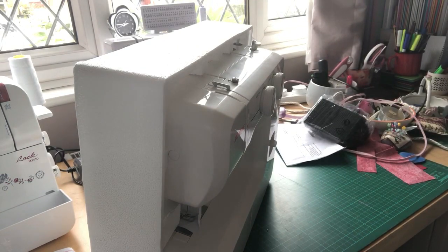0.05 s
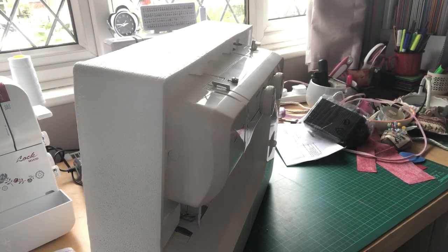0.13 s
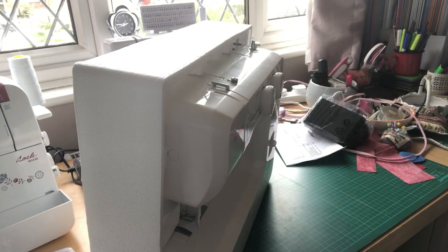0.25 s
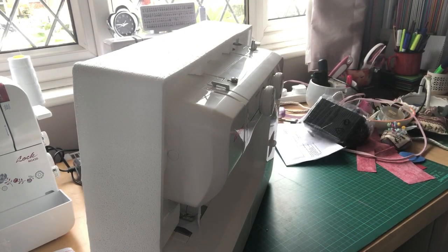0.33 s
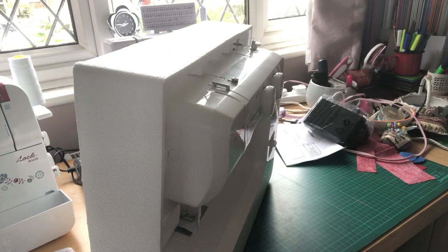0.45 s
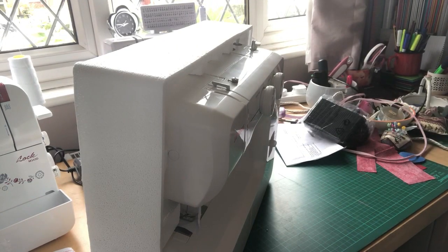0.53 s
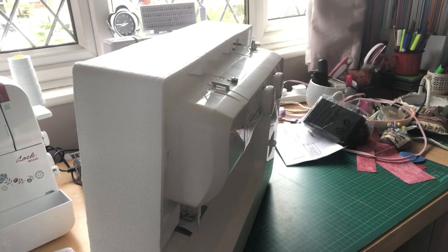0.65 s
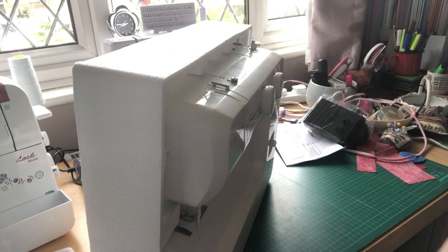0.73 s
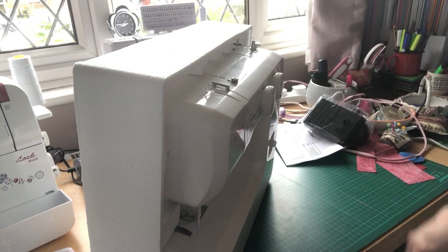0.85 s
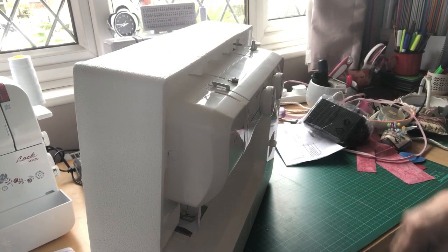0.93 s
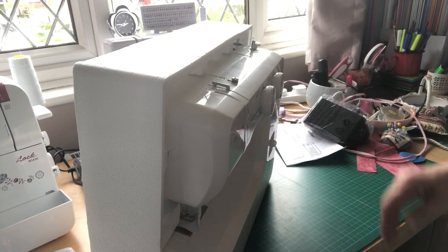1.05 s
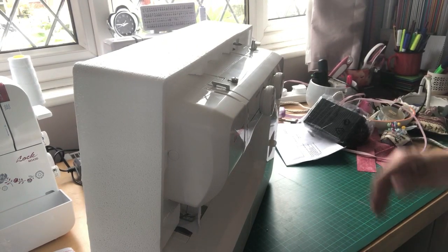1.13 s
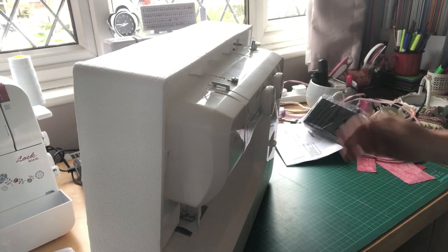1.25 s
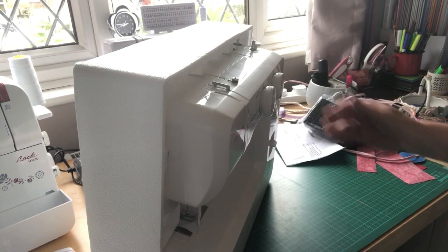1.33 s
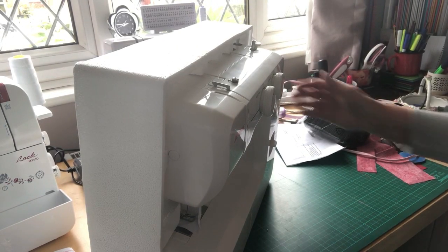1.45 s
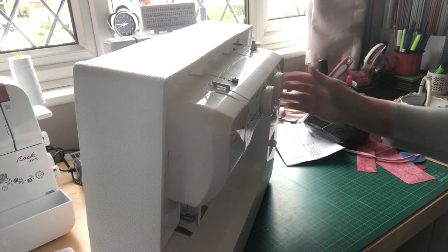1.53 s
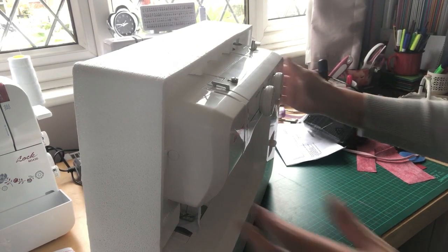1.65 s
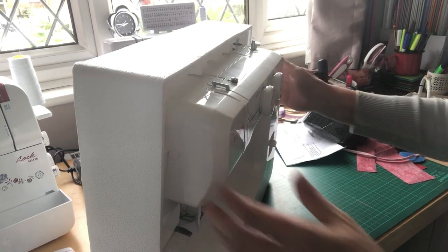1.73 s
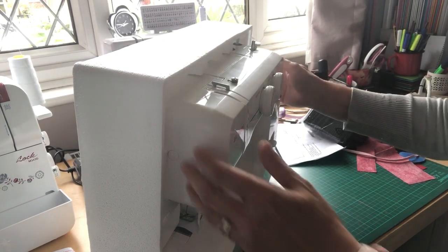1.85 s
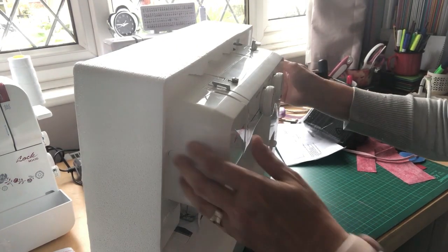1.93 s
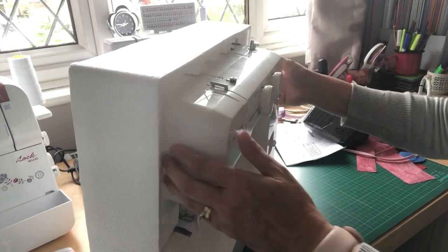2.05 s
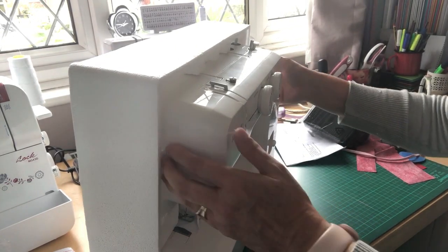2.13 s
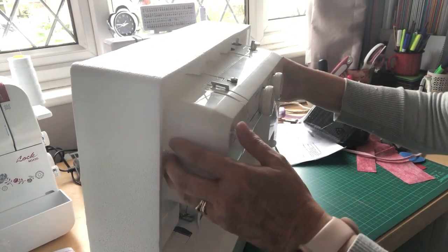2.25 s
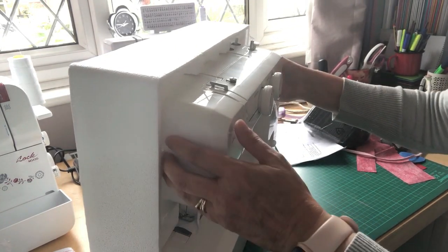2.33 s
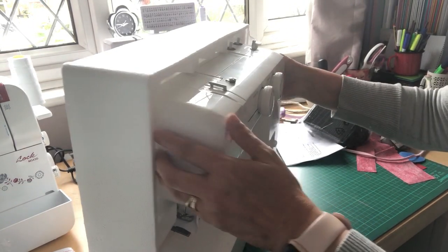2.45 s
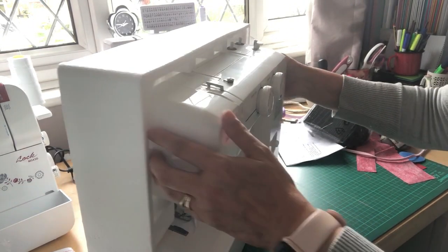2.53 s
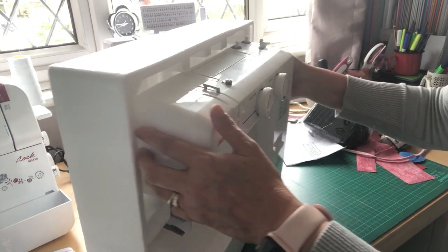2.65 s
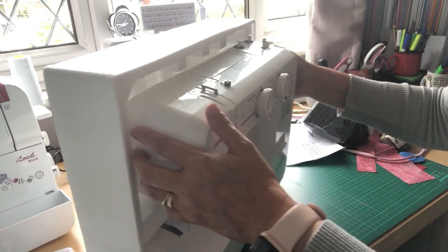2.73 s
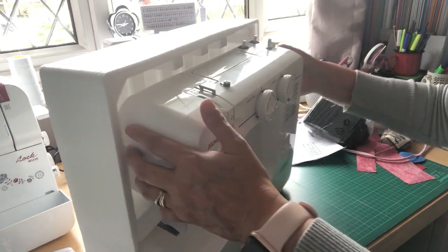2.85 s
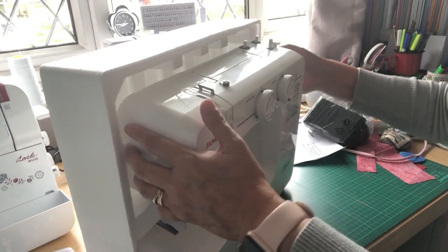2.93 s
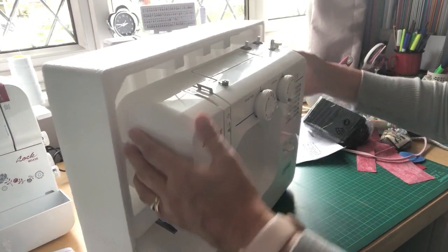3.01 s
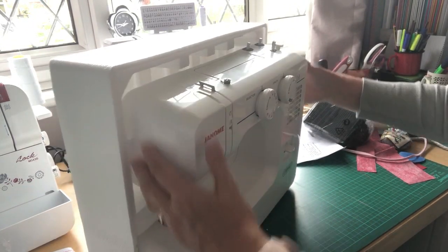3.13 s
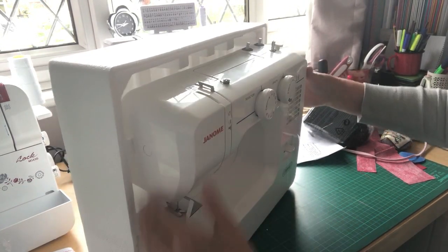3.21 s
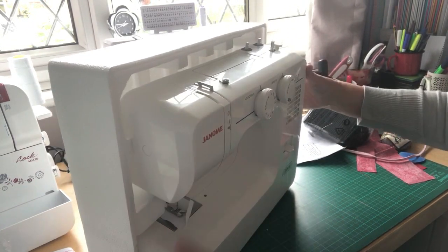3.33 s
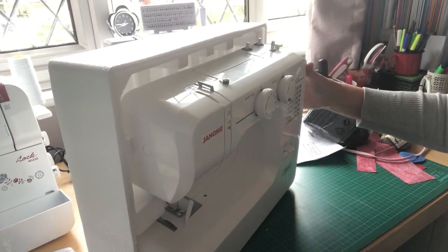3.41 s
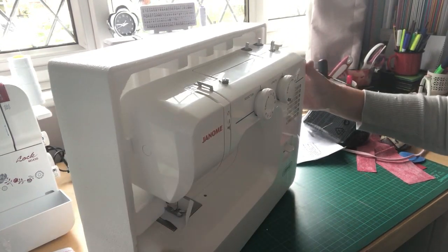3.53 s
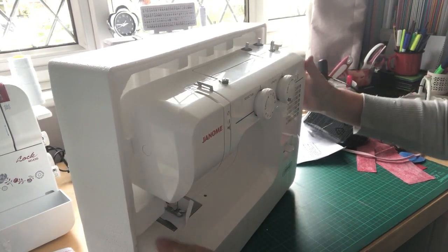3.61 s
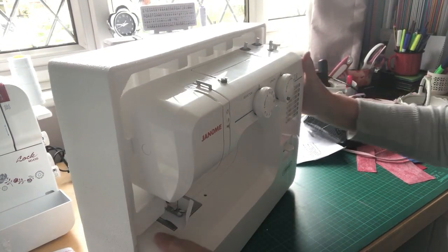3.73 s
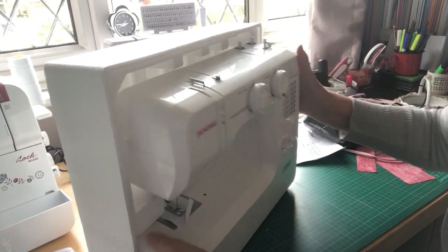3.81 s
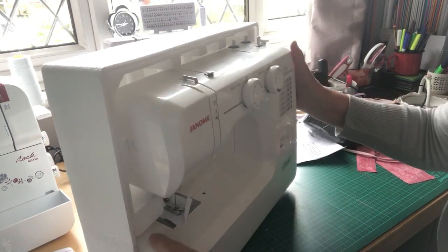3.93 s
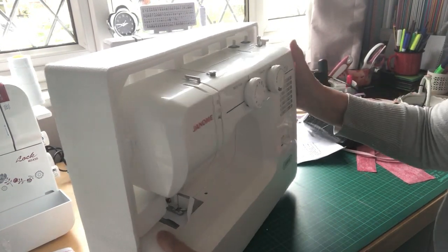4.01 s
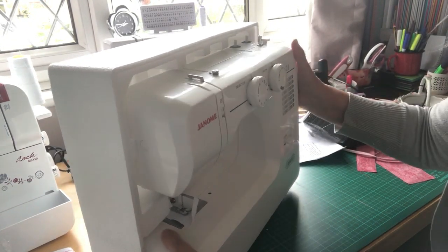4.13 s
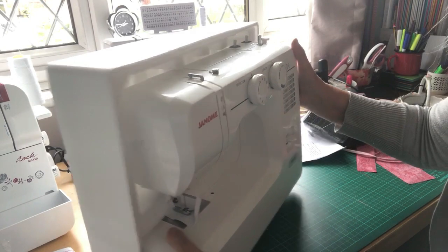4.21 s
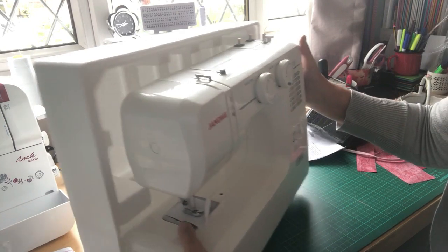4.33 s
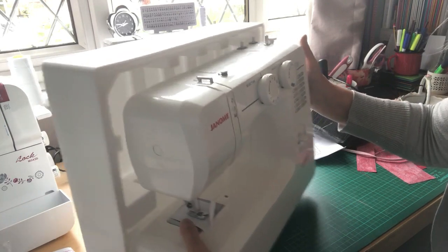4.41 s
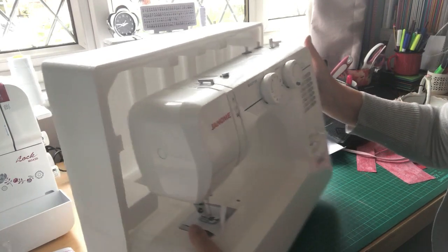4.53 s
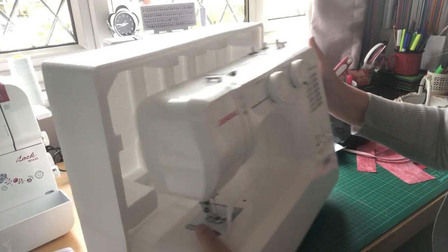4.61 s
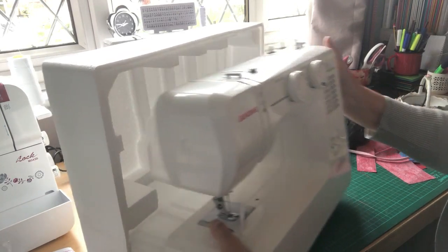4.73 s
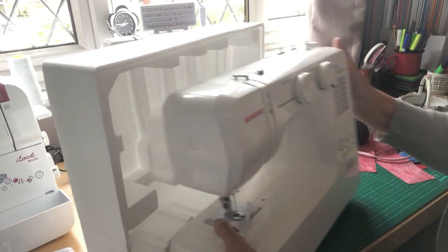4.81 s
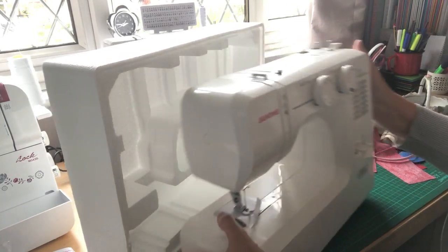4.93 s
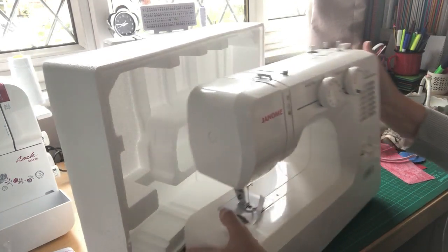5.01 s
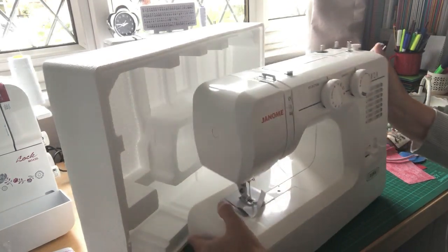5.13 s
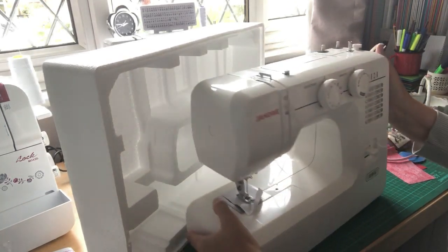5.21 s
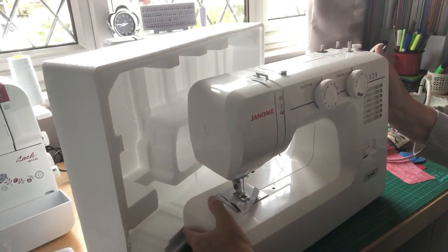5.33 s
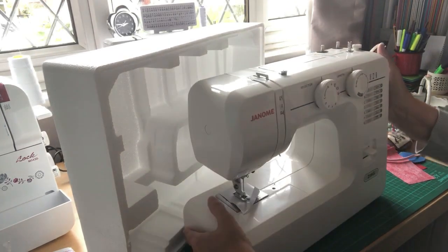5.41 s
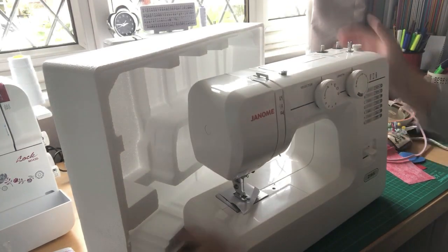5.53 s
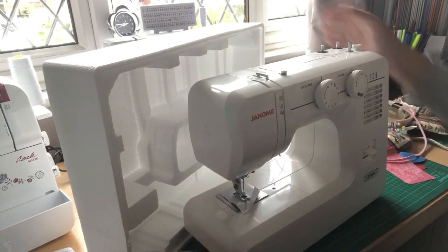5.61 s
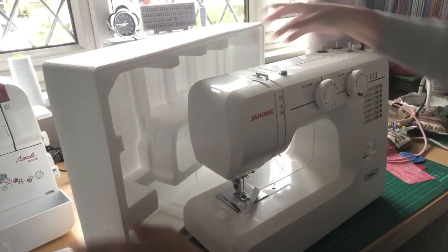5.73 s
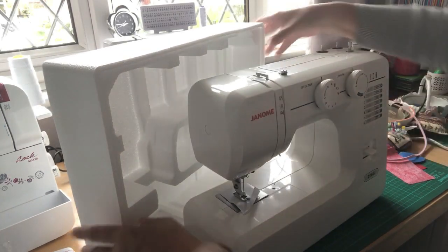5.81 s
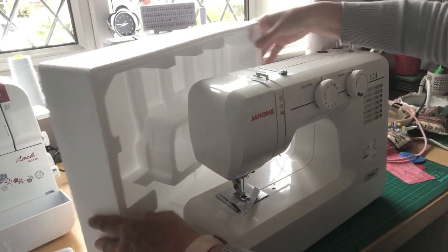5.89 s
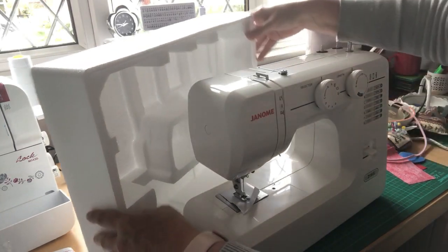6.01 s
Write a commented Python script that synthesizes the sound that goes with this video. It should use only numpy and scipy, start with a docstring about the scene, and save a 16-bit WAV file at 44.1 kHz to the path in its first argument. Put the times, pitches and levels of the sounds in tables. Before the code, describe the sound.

A quiet small furnished room with faint, low air, heard close. From 0 to 1.7 s there are only weak dry foam rustles, a small click at 0.4, soft ticks and a barely audible sinking low tone near 1.2. At 1.77 a fingertip tap and light bump on plastic. From 2.05 foam is gripped and rubbed: a sharp snap, hollow boxy bumps, a strong scrape at 2.2, another at 2.45. A knock at 2.7 leads into a cluster of snaps and a rough creak from 2.8 to 3.1. A short lull, then scraping resumes from 3.4, with a creak at 3.7 and a crisp crack and squeak at 3.79. The loudest moment is 4.1 to 4.4: hard bright cracks, a harsh rub, rising creak and tiny squeaks. Bumps and dull desk thuds follow at 4.45, 4.87 and 5.19, with faint contact at 5.43. Near silence, then a crisp foam scrape from 5.9 to the end.

```python
"""Stiff foam rubs, creaks and snaps free in jerks as a sewing machine is worked out of its moulded block.
Rubbing is many random bead clicks, shaped by each stroke; creaks pulse it, and snaps are short bursts.
The hollow block booms when bumped and the desk thuds under the machine, both as sets of fading tones.
Later the hands take hold of the block again. There are also short squeaks, taps on the plastic housing
and a faint sinking tone, over the quiet air of a small furnished room."""
import sys
import numpy as np
from scipy import signal
from scipy.io import wavfile
from scipy.ndimage import uniform_filter1d

SR = 44100
rng = np.random.default_rng(int(sys.argv[2]) if len(sys.argv) > 2 else 0)


def unload_audio(sound):
    """Save the sound as a 16-bit wav file, at the path given as the first command line argument."""
    columns = np.transpose(np.atleast_2d(sound))
    # keep every value between -1 and 1, then stretch to whole-number steps
    steps = np.round(np.clip(columns, -1, 1) * 32767)
    wavfile.write(sys.argv[1], SR, steps.astype(np.int16))


N = 267246  # length of the scene in samples, about 6 s
REST_DB = -75  # steady faint hiss under all strokes, before mixing

# Strokes of foam over plastic; levels are before mixing. Columns:
# (start [s], attack [s], hold [s], release [s per 20 dB], hiss level [dB],
#  rasp of the pressed edges [dB against hiss], fizz of the sharpest beads [dB against hiss])
STROKES = [(0.106, 0.012, 0.31, 0.654, -67.0, 7.0, -17.0), (0.223, 0.011, 0.009, 0.083, -65.0, 12.5, -17.5),
           (0.403, 0.069, 0.034, 0.19, -55.5, 3.5, -10.5), (0.594, 0.032, 0.032, 0.053, -53.0, -1.5, -12.0),
           (0.719, 0.042, 0.017, 0.144, -59.0, -5.5, -7.0), (0.885, 0.041, 0.006, 0.07, -58.0, -20.5, -4.5),
           (1.047, 0.064, 0.009, 0.051, -61.0, 3.5, -22.5), (1.163, 0.149, 0.015, 0.331, -59.5, 3.5, -16.5),
           (1.766, 0.054, 0.014, 0.03, -66.5, 16.0, -20.0),
           (2.017, 0.005, 0.059, 0.153, -57.0, 10.0, -11.0), (2.089, 0.009, 0.034, 0.04, -46.5, 4.5, -4.5),
           (2.17, 0.047, 0.007, 0.121, -36.0, 2.0, -11.0), (2.326, 0.022, 0.086, 0.092, -52.5, 11.5, -6.5),
           (2.413, 0.082, 0.088, 0.155, -40.5, -1.5, -10.0),
           (2.571, 0.083, 0.062, 0.044, -44.5, 5.0, -15.5), (2.739, 0.035, 0.022, 0.03, -51.0, 9.0, -12.5),
           (2.786, 0.016, 0.037, 0.092, -41.5, 12.0, -6.0), (2.891, 0.012, 0.035, 0.042, -48.5, 7.0, -22.5),
           (2.94, 0.017, 0.056, 0.178, -46.5, 13.0, -12.0), (3.039, 0.07, 0.051, 0.04, -46.5, -3.5, -5.0),
           (3.288, 0.005, 0.012, 0.15, -55.0, 6.5, -11.0), (3.407, 0.113, 0.024, 0.05, -45.5, -3.5, -7.5),
           (3.586, 0.018, 0.031, 0.033, -38.0, -9.0, -5.5), (3.6, 0.041, 0.085, 0.108, -44.0, 8.5, -21.0),
           (3.789, 0.005, 0.019, 0.138, -47.5, 1.0, -12.5), (3.838, 0.12, 0.022, 0.073, -44.5, 1.0, -18.0),
           (4.012, 0.023, 0.085, 0.096, -44.0, -2.0, -19.0), (4.116, 0.03, 0.072, 0.1, -38.0, -3.5, -9.0),
           (4.2, 0.066, 0.014, 0.081, -28.0, -9.5, -4.0), (4.324, 0.01, 0.033, 0.135, -38.5, -1.5, -22.5),
           (4.418, 0.022, 0.015, 0.077, -45.0, 5.5, -5.5), (4.548, 0.02, 0.011, 0.124, -63.5, 10.0, -18.5),
           (4.667, 0.032, 0.01, 0.056, -72.0, 13.5, -20.0), (5.073, 0.011, 0.041, 0.1, -64.5, 5.0, -18.5),
           (5.168, 0.021, 0.084, 0.091, -70.0, 17.0, -20.5),
           (5.452, 0.016, 0.019, 0.023, -59.0, 0.5, -10.0), (5.898, 0.006, 0.043, 0.214, -39.0, -5.5, -4.5),
           (5.959, 0.089, 0.025, 0.1, -35.5, -7.0, -2.5)]


def stroke_strengths():
    """Each stroke builds, holds and lets go; returns the strength of hiss, rasp and fizz over time."""
    sag_db_per_s = 10  # a stroke loses force from its start onward
    rasp_power, fizz_power = .88, 1.25  # as the force fades, the rasp lingers and the fizz goes first
    t = np.arange(SR) / SR
    power = np.zeros((3, N))
    for start, attack_s, hold_s, release_s, hiss_db, rasp_db, fizz_db in STROKES:
        build = np.sin(np.pi / 2 * np.minimum(t / attack_s, 1)) ** 2
        release_db = 20 * np.maximum(t - attack_s - hold_s, 0) / release_s
        force = build * gain_of(-sag_db_per_s * t - release_db)
        add(power[0], start, (gain_of(hiss_db) * force) ** 2)
        add(power[1], start, (gain_of(hiss_db + rasp_db) * force ** rasp_power) ** 2)
        add(power[2], start, (gain_of(hiss_db + fizz_db) * force ** fizz_power) ** 2)
    power[0] += gain_of(REST_DB) ** 2
    return np.sqrt(power)


# Stick-slip creaks. Columns: (start [s], end [s], first rate [slips per s], last rate [slips per s],
#  depth [0-1], jitter of the rate [0-1])
CREAKS = [(2.335, 2.42, 70, 50, .15, .15), (2.793, 2.826, 540, 600, .85, .02),
          (2.823, 2.846, 340, 240, .5, .08), (2.96, 3.08, 190, 110, .22, .11),
          (3.67, 3.749, 230, 120, .3, .11), (4.215, 4.286, 380, 810, .8, .11)]


def stick_slip(slip_s=.0011):
    """The grip builds and breaks: returns a pulsing factor on the friction and a kick at each release."""
    grip, kicks = np.ones(N), np.zeros(N)
    for start, end, first, last, depth, jitter in CREAKS:
        length = round((end - start) * SR)
        unsteady = np.exp(jitter * evened(uniform_filter1d(rng.standard_normal(length), size=150)))
        rate = np.geomspace(first, last, length) * unsteady
        turns = np.cumsum(rate) / SR
        share = np.clip(depth, 0, 1) * signal.windows.tukey(length, .2)
        since_slip_s = (turns % 1) / rate
        pulses = evened(np.exp(-since_slip_s / slip_s))
        releases = np.diff(np.floor(turns), prepend=0)  # 1 at each new slip
        add(grip, start, share * (pulses - 1))
        add(kicks, start, share * evened(releases))
    return grip, kicks


def shell_motion(rasp):
    """Strength of the shell's drone: a steady floor, more with the rasp, and a shudder after every knock."""
    top_db, knee_db = -48, -41  # the drone follows the rasp up to a knee, then levels off
    floor_db = -73  # steady faint low drone under everything
    bump_share_db, thud_share_db = -17.5, -23  # shudder against the knock that starts it
    shudder_s = .2  # time to fall 20 dB
    t = np.arange(SR) / SR
    shudder = gain_of(-20 * t / shudder_s)
    driven = gain_of(top_db) * rasp / (rasp + gain_of(knee_db))
    power = driven ** 2 + gain_of(floor_db) ** 2
    for table, share_db in ((BUMPS, bump_share_db), (THUDS, thud_share_db)):
        for start, db, *_ in table:
            add(power, start, (gain_of(db + share_db) * shudder) ** 2)
    return np.sqrt(power)


# Tone balance of the fine hiss. Columns: (frequency [Hz], relative level [dB per Hz])
HISS = [(300, -23.5), (1000, 1), (2200, 2.5), (4000, 4.5), (5500, 0), (7500, -3), (10000, -17),
        (15500, -16.5)]
# Tone balance of the coarse rasp. Columns: (frequency [Hz], relative level [dB per Hz])
RASP = [(200, -29.5), (450, -5), (600, -1.5), (750, -3), (950, -0.5), (1700, -3), (2600, -10),
        (5000, -16.5), (15000, -49.5)]
# Tone balance of the hollow shell's drone. Columns: (frequency [Hz], relative level [dB per Hz])
DRONE = [(30, -28.5), (60, -17.5), (110, -11), (170, -10.5), (228, -4.5), (300, -8), (430, -15), (800, -35),
         (3000, -74.5)]


def sliding(hiss, rasp, fizz):
    """Foam dragged over smooth plastic: fine hiss and fizz, coarser rasp and the drone of the shell."""
    grip, kicks = stick_slip()
    fine_force = grip * evened(beads(N, per_s=9000, spread_db=2.0)) + .6 * kicks
    coarse_force = grip * evened(beads(N, per_s=3500, spread_db=0.1)) + 1.27 * kicks
    fine = wander(colour(fine_force, HISS), patchy_db=0.74, flutter_db=1.1)
    coarse = wander(colour(coarse_force, RASP), patchy_db=2.0, flutter_db=0.3)
    sharp_spectrum = [(3000, -38), (7000, -3.5), (10000, -1.5), (15500, -6.5)]  # (Hz, dB per Hz)
    sharp = evened(colour(grip * beads(N, per_s=13000, spread_db=3.0), sharp_spectrum))
    hollow = evened(colour(beads(N, per_s=900, spread_db=.6), DRONE))
    bright = gain_of(-2) * (hiss * fine + fizz * sharp)
    rough = gain_of(-5.5) * rasp * coarse
    drone = gain_of(-1.5) * shell_motion(rasp) * hollow
    return bright + rough + drone


# Foam catching and letting go; levels are before mixing. Columns:
# (time [s], level [dB], pitch of the contact [Hz], rise [s], crunch [dB against the clack])
SNAPS = [(.234, -53, 1250, .0018, -11), (.385, -39, 1350, .0031, -4), (.39, -42.5, 565, .0066, -.5),
         (.731, -54, 530, .0019, -7), (1.094, -48.5, 1300, .005, -8), (1.269, -42, 1160, .006, -14),
         (1.305, -45, 1300, .0025, -10), (1.327, -42.5, 1130, .001, -23), (1.491, -51, 910, .0012, -14),
         (1.764, -40, 1590, .0037, -1.5), (1.779, -46.5, 645, .0026, -2), (1.882, -46, 1970, .004, -9),
         (2.051, -28, 1200, .0009, -3), (2.169, -35.5, 1100, .0026, -9), (2.179, -28.5, 740, .0016, -7.5),
         (2.347, -39.5, 850, .011, -10), (2.713, -30, 794, .0012, -8.5), (2.844, -29, 1290, .0014, -5.5),
         (2.853, -34, 1400, .0013, -1), (2.867, -31, 1390, .0008, -.5), (2.878, -34, 1190, .001, -6),
         (2.9, -28.5, 1430, .0018, -8), (2.92, -28.5, 880, .0026, -10), (2.949, -41, 3000, .0009, 0),
         (2.96, -35, 1560, .0033, 0), (3.293, -32.5, 950, .0016, -2.5), (3.38, -46, 570, .0034, -.5),
         (3.381, -43.5, 6960, .0016, -12), (3.417, -59, 2200, .009, 13.5), (3.689, -39, 1200, .0015, 1),
         (3.709, -40, 1100, .0006, 0), (3.719, -32, 1900, .001, 1), (3.767, -31.5, 1370, .0012, -8),
         (3.786, -35, 3470, .002, 0), (3.7905, -28, 4700, .0028, 8), (4.1392, -20.5, 3020, .0029, -10),
         (4.193, -34.5, 585, .0012, -8), (4.276, -29.5, 3610, .0027, -3.5), (4.312, -31, 1490, .0038, 14),
         (4.359, -17, 2370, .0012, -20), (4.38, -25.5, 1500, .0018, 2), (4.465, -35, 750, .0027, -6.5),
         (4.854, -48, 1500, .011, -9.5), (4.857, -43.5, 470, .008, -11.5), (5.081, -50.5, 600, .0056, -6.5),
         (5.179, -48, 525, .004, -20), (5.4275, -45.5, 3000, .0018, 8.5), (5.431, -40, 430, .0047, -11),
         (5.899, -38, 1210, .004, 6), (5.921, -31, 1300, .001, .5)]
# Tone balance of the crunching beads. Columns: (frequency [Hz], relative level [dB per Hz])
CRUNCH = [(100, -29.5), (400, 3), (1000, 1), (3000, 3), (5500, 0.5), (8000, -7), (11000, -9.5),
          (15500, -11.5)]


def snaps(rows, sharpness=0.96, ring_s=0.015, ring_share=0.23, squeak_hz=70, squeak_db=-9):
    """A caught edge lets go: an avalanche of beads crunches, and the wall at the contact rings on briefly."""
    out, t = np.zeros(N), np.arange(SR // 10) / SR
    for start, db, hz, rise_s, crunch_db in rows:
        swell = t / rise_s * np.exp(1 - t / rise_s)
        envelope = swell + ring_share * np.exp(-t / ring_s)
        burst = envelope * beads(len(t), per_s=20000, spread_db=0.5)
        clack = resonate(resonate(burst, hz, hz / sharpness), hz, hz)
        squeak = resonate(clack, hz, squeak_hz)  # squeak_hz is the width of this narrow resonance
        crunch = colour(envelope * beads(len(t), per_s=16000, spread_db=1.0), CRUNCH)
        tonal = evened(evened(clack) + gain_of(squeak_db) * evened(squeak))
        sound = tonal + gain_of(crunch_db) * evened(crunch)
        strength = np.sqrt(np.mean(envelope ** 2))
        add(out, start, gain_of(db - 5.5) * strength * sound)
    return out


def crackles(rasp, count=130, crunch_db=-3):
    """Small snaps at random moments, as strong as the edges are pressed; rows as in SNAPS."""
    offset_db, spread_db = -4.5, 3  # level against the rasp, and how far it strays either way
    middle_hz, rise_s = 1300, .0004
    rows = []
    for place, size, tone in rng.uniform(0, 1, (count, 3)):
        rasp_db = 20 * np.log10(rasp[int(place * N)] + gain_of(REST_DB))
        db = rasp_db + offset_db + spread_db * (2 * size - 1)
        hz = middle_hz * 2 ** (2 * tone - 1)  # up to an octave either way
        rows.append((place * N / SR, db, hz, rise_s, crunch_db))
    return rows


# Squeaks, where the slipping locks onto a wall resonance; levels are before mixing. Columns:
# (time [s], length [s], first pitch [Hz], last pitch [Hz], level [dB])
SQUEAKS = [(3.7888, 0.0088, 896, 870, -21.5), (3.802, 0.011, 894, 810, -29.5),
           (4.215, 0.033, 975, 795, -38), (4.262, .009, 690, 730, -26.5), (4.274, 0.014, 3700, 3640, -29),
           (4.325, 0.0075, 1390, 1330, -31), (4.317, .014, 2910, 2800, -32),
           (4.362, 0.0076, 1710, 1650, -24.5), (4.366, 0.0062, 1050, 950, -29.5),
           (4.382, .012, 1475, 1550, -30)]


def squeaks(waver=0.048, overtone_db=-15):
    """Brief unsteady whistles of foam on plastic: a gliding tone with one overtone."""
    out = np.zeros(N)
    for start, length_s, first_hz, last_hz, db in SQUEAKS:
        length = round(length_s * SR)
        unsteady = 1 + waver * evened(uniform_filter1d(rng.standard_normal(length), size=30))
        hz = np.geomspace(first_hz, last_hz, length) * unsteady
        phase = 2 * np.pi * np.cumsum(hz) / SR
        whistle = evened(np.sin(phase) + gain_of(overtone_db) * np.sin(2 * phase))
        add(out, start, gain_of(db) * whistle * signal.windows.tukey(length, .7))
    return out


# Resonances of the foam walls. Columns: (frequency [Hz], width [Hz], level [dB over the direct sound])
WALLS = [(594, 190, -4.5), (764, 35, -7), (916, 54, -5), (1080, 29, -14), (1503, 44, -17), (1744, 42, -10),
         (1890, 39, -8), (2396, 24, -15.5), (2980, 180, -32), (3540, 61, -6.5), (4130, 51, -17),
         (5180, 41, -16)]


def walls(x):
    """The stiff, light walls of the block colour whatever scrapes them."""
    ringing = sum(gain_of(db) * resonate(x, hz, width_hz) for hz, width_hz, db in WALLS)
    return gain_of(-0.5) * (x + ringing)


def blow(modes, pitch, contact_s, spread_db):
    """A soft blow rings a set of modes, each a little differently with the place that is struck."""
    t = np.arange(SR // 3) / SR
    ring = np.zeros(len(t))
    for hz, db, t60 in modes:
        level = gain_of(db + spread_db * rng.standard_normal())
        fade = np.exp(-np.log(1000) * t / t60)  # falls 60 dB in t60
        ring += level * fade * np.sin(2 * np.pi * hz * pitch * t)
    return ring * (1 - np.exp(-t / contact_s))


# Bumps on the hollow block. Columns: (time [s], level [dB], pitch [factor on the shell modes])
BUMPS = [(1.772, -35.5, .96), (1.9, -42, 1.12), (2.055, -25.5, 1.12), (2.109, -29.5, 1.2),
         (2.177, -25.5, 1.04), (2.199, -31.5, .78), (2.355, -25.5, 1.0), (2.371, -31.5, .93),
         (2.391, -30.5, 1.0), (2.43, -28.5, 1.0), (2.564, -34, 1.04), (2.582, -30.5, 1.09),
         (2.715, -23.5, 1.26), (2.92, -25.5, 1.065), (3.151, -37, 1.14), (3.167, -40, .72),
         (3.299, -36, 1.04), (3.387, -41.5, .84), (3.668, -29.5, 1), (3.769, -34, 1.17), (3.811, -30, .98),
         (3.908, -36, 1.21), (4.198, -35.5, 1.08), (4.271, -27, .97), (4.43, -33, 1.04), (4.467, -26, 1.05),
         (4.504, -35, 1.06), (4.575, -36, 1.1), (4.71, -50, 1.0), (4.864, -39, 1.4), (5.015, -54, 1.3),
         (5.185, -36, 1.0), (5.432, -46, 1.1), (5.906, -33, .96), (5.929, -33, .89), (5.98, -36, .78)]
# Modes of the hollow shell, before pitch and chance. Columns: (frequency [Hz], level [dB], 60 dB fade [s])
SHELL = [(166.4, -14, 0.14), (221.4, -4, 0.05), (232.5, 1, 0.095), (270, 1, 0.03), (410, -8, 0.062),
         (622, -5.5, 0.052), (740, -15.5, 0.034)]
# The heavy machine meeting the desk. Columns: (time [s], level [dB])
THUDS = [(.485, -53), (.515, -58), (3.169, -44), (3.405, -44.5), (4.272, -37.5), (4.332, -35.5),
         (4.453, -35), (4.858, -38), (4.872, -30.5), (4.899, -39), (5.095, -48), (5.14, -47), (5.187, -34),
         (5.221, -40.5), (5.446, -41.5), (5.5, -49), (5.911, -46)]
# Modes of the desk, levels before chance. Columns: (frequency [Hz], level [dB], 60 dB fade [s])
DESK = [(68.5, -4, 0.15), (101, -3.5, 0.12), (130.5, 2, 0.13), (174.5, -5.5, .1), (215.6, -5, 0.11),
        (285, -7, 0.084), (366, -7.5, 0.076), (523, -6, 0.049)]


def knocks(bass_hz=52):
    """The machine bumps the hollow block and lands on the desk, ringing the modes of each."""
    out = np.zeros(N)
    for start, db, pitch in BUMPS:
        add(out, start, gain_of(db) * blow(SHELL, pitch, contact_s=.003, spread_db=.8))
    for start, db in THUDS:
        add(out, start, gain_of(db) * blow(DESK, 1, contact_s=0.0019, spread_db=3.3))
    # bodies this small radiate little deep bass
    return signal.sosfilt(signal.butter(3, bass_hz, "highpass", fs=SR, output="sos"), out)


# Fingers tapping the machine's plastic housing. Columns: (time [s], level [dB])
TAPS = [(.388, -41), (1.27, -54), (1.329, -51), (1.767, -32), (1.884, -49), (2.051, -38), (5.429, -41.5)]
# Modes of the housing, before pitch and chance. Columns: (frequency [Hz], level [dB], 60 dB fade [s])
HOUSING = [(1130, -7, 0.055), (1499, -1, 0.031), (1884, -2.5, 0.05), (1987, -15.5, 0.1),
           (2440, -16.5, 0.034), (3615, -13, 0.028), (4560, -9.5, 0.031)]


def taps():
    """A fingertip rings the plastic panels."""
    out = np.zeros(N)
    for start, db in TAPS:
        add(out, start, gain_of(db) * blow(HOUSING, 0.97, contact_s=0.0013, spread_db=3.5))
    return out


# A faint low tone that slides down. Columns: (time [s], pitch [Hz], level [dB])
GLIDE = [(1.185, 205, -75), (1.21, 180, -55.5), (1.235, 172, -53), (1.28, 131, -55.5), (1.31, 115, -75)]


def low_glide():
    """A soft pure tone that sinks in pitch: a sine that follows the table."""
    t = np.arange(N) / SR
    times, hz, db = np.transpose(GLIDE)
    level = np.interp(t, times, gain_of(db), left=0, right=0)
    phase = 2 * np.pi * np.cumsum(np.interp(t, times, hz)) / SR
    return level * np.sin(phase)


# How long the room rings. Columns: (frequency [Hz], 60 dB fade [s])
ROOM = [(100, 0.27), (260, 0.44), (700, 0.21), (1840, 0.17), (4850, 0.13), (15000, 0.17)]


def room(x, wet_db, gap_s=0.0052):
    """Dense reflections of a small furnished room: noise that fades at its own speed in each band."""
    hz, t, z = signal.stft(rng.standard_normal(SR // 2), SR, nperseg=256)
    fade = np.exp(-np.log(1000) * t / read(ROOM, hz)[:, None])
    tail = signal.istft(z * fade)[1]
    tail *= 1 - np.exp(-(np.arange(len(tail)) / SR / gap_s) ** 2)  # reflections need time to arrive
    return x + gain_of(wet_db) * signal.fftconvolve(x, tail / np.linalg.norm(tail))[:N]


# Tone balance of the room's quiet air. Columns: (frequency [Hz], relative level [dB per Hz])
AIR = [(15, -51.5), (25, -28), (48, -2), (107, 0.5), (137, -3.5), (211, -10), (248, -6.5), (557, -5),
       (3130, -20), (3390, -18.5), (3990, -18), (7830, -20.5), (15800, -27.5)]


def quiet_air(level_db=-69.5):
    """The steady background: random noise filtered to the tone balance of the air."""
    return gain_of(level_db) * evened(colour(rng.standard_normal(N), AIR))


def gain_of(db):
    """Decibels to amplitude."""
    return 10 ** (np.asarray(db) / 20)


def evened(x):
    """Scales to an rms (average strength) of 1."""
    return x / np.sqrt(np.mean(x ** 2) + 1e-20)


def read(points, hz):
    """Reads a table on a log-frequency axis."""
    f, value = np.transpose(points)
    return np.interp(np.log(hz + 1), np.log(f + 1), value)


def add(mix, start, sound):
    """Mixes a sound in, in place, at a time in seconds."""
    part = mix[max(round(start * SR), 0):][:len(sound)]
    part += sound[:len(part)]


def colour(x, spectrum, size=4096):
    """Filters a sound to the given spectrum, with no sound ahead of its cause."""
    hz = abs(np.fft.fftfreq(size, 1 / SR))
    log_gain = np.log(gain_of(read(spectrum, hz)))
    response = np.exp(np.conj(signal.hilbert(log_gain)))  # minimum phase
    kernel = np.fft.ifft(response).real
    return signal.oaconvolve(x, kernel[:size // 2])[:len(x)]


def resonate(x, hz, width_hz):
    """One resonance of gain 1 at its peak."""
    return signal.lfilter(*signal.iirpeak(hz, hz / width_hz, SR), x)


def beads(length, per_s, spread_db):
    """Tiny clicks of uneven size as foam beads catch and release."""
    size = gain_of(spread_db * np.minimum(rng.exponential(1, length), 4))
    sign = rng.choice([-1, 1], length)
    return size * sign * (rng.random(length) < per_s / SR)


def smooth_noise(shape, across_hz, across_time):
    """Random values blurred over neighbouring frequency bins and time frames, counted in cells."""
    blurred = uniform_filter1d(rng.standard_normal(shape), size=across_hz, axis=0)
    return evened(uniform_filter1d(blurred, size=across_time, axis=1))


def wander(x, patchy_db, flutter_db, streak_db=2.5):
    """The contact point moves: patches of the spectrum swell, narrow modes ring up, and the grip flutters."""
    z = signal.stft(x, nperseg=1024)[2]
    patches = smooth_noise(z.shape, across_hz=14, across_time=3)
    streaks = smooth_noise(z.shape, across_hz=2, across_time=6)
    flutter = rng.standard_normal(z.shape[1])
    change_db = patchy_db * patches + streak_db * streaks + flutter_db * flutter
    return evened(signal.istft(z * gain_of(change_db))[1][:len(x)])


def scene():
    """Scraping and knocks in the room, with the low tone and the quiet air."""
    hiss, rasp, fizz = stroke_strengths()
    scraping = walls(sliding(hiss, rasp, fizz) + snaps(SNAPS + crackles(rasp)))
    treble = scraping + gain_of(-2) * squeaks() + taps()
    in_room = room(treble, wet_db=-10) + room(knocks(), wet_db=-12.5)
    return (in_room + low_glide() + quiet_air())[None]


def record(dry):
    """The recorder's band limit: removes what lies above 16 kHz."""
    low_pass = signal.firwin(511, 16000, window=("kaiser", 9), fs=SR)
    return signal.oaconvolve(dry, low_pass[None], "same")


dry = scene()
out = record(dry)
unload_audio(out)
```